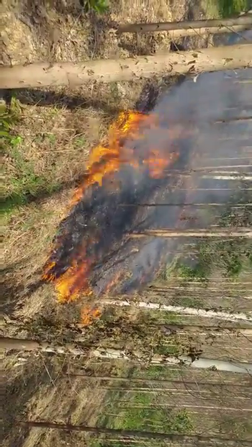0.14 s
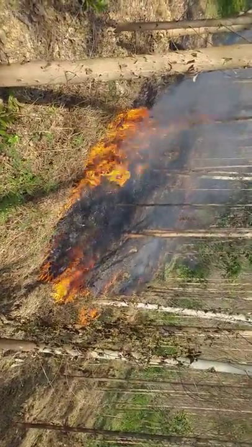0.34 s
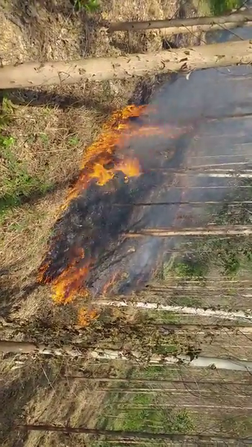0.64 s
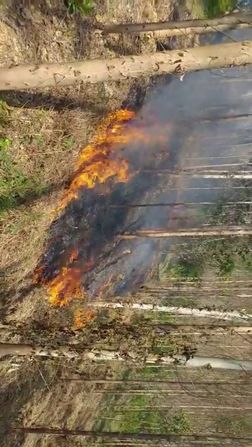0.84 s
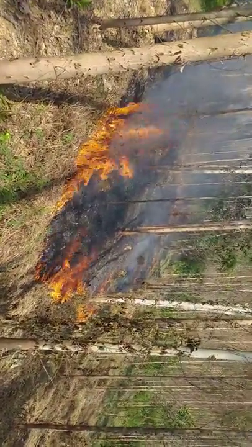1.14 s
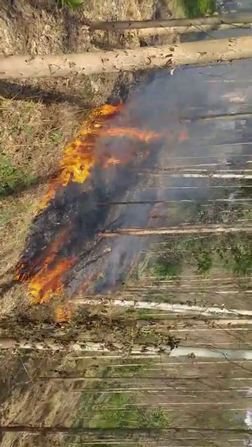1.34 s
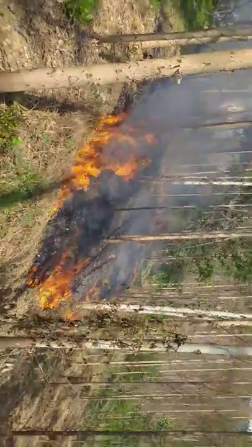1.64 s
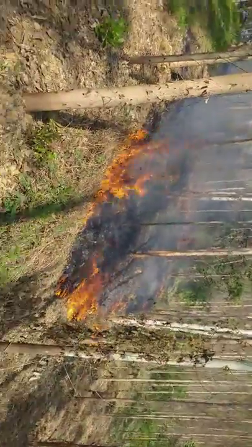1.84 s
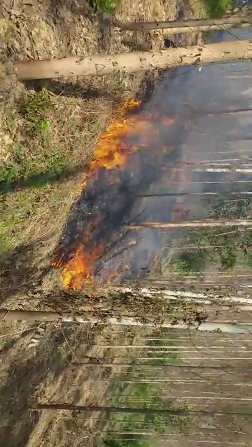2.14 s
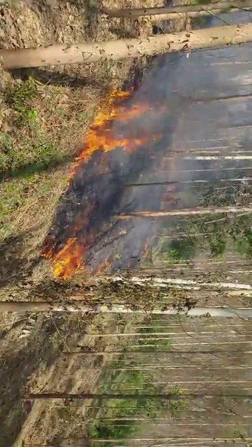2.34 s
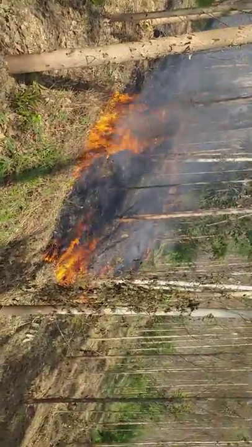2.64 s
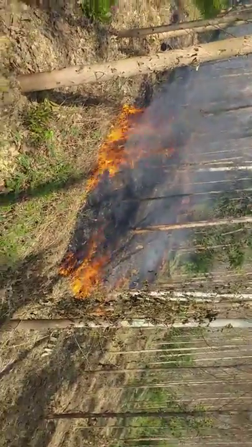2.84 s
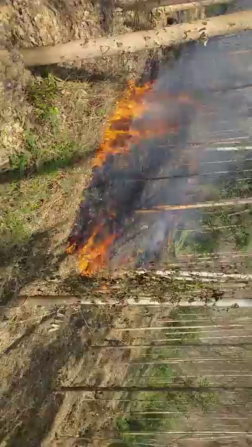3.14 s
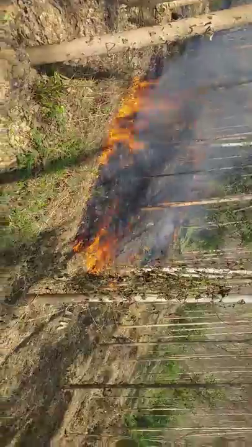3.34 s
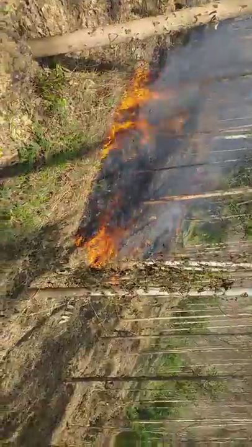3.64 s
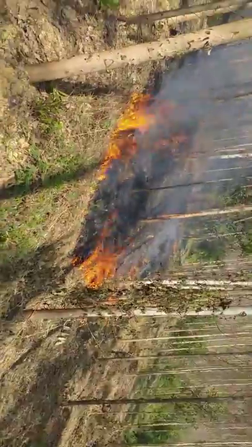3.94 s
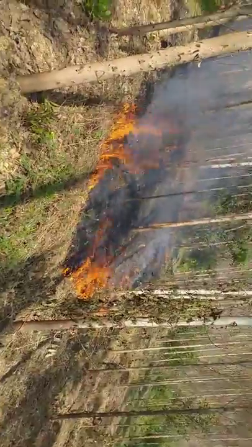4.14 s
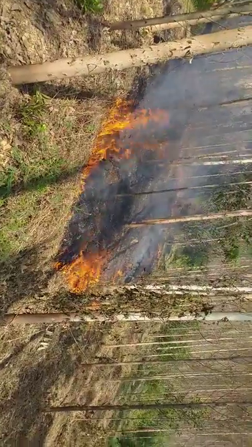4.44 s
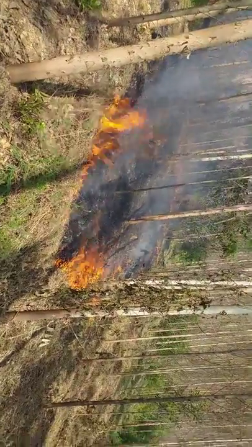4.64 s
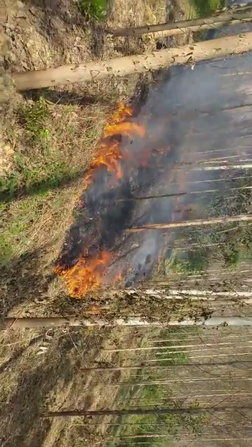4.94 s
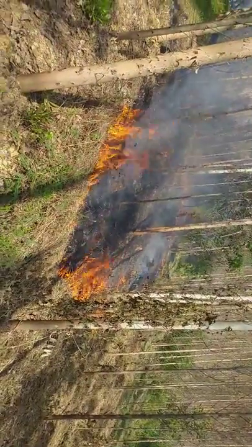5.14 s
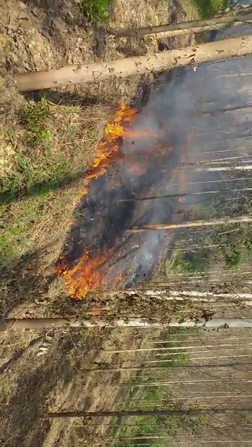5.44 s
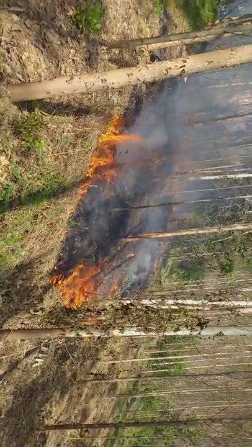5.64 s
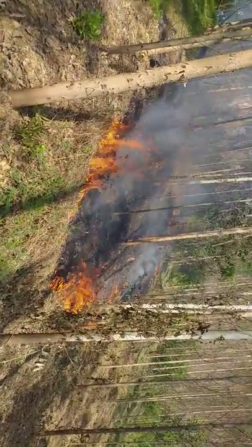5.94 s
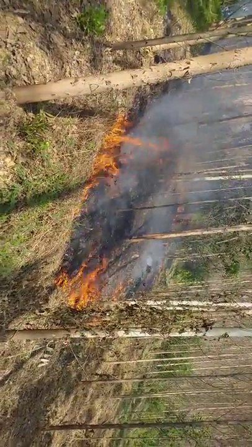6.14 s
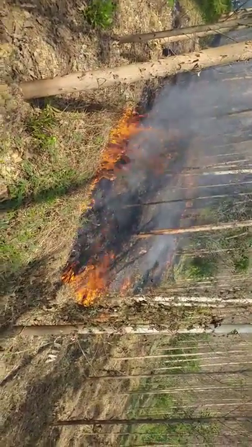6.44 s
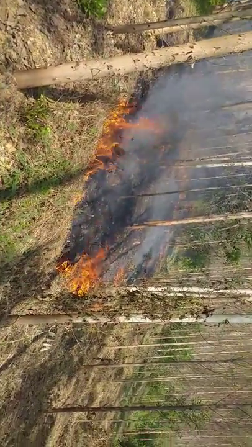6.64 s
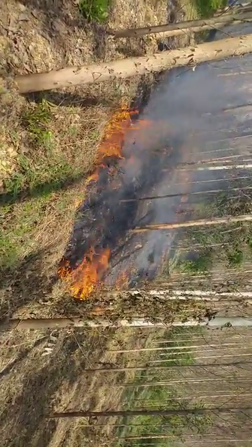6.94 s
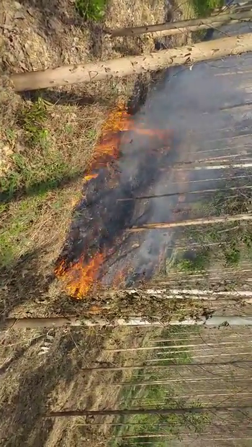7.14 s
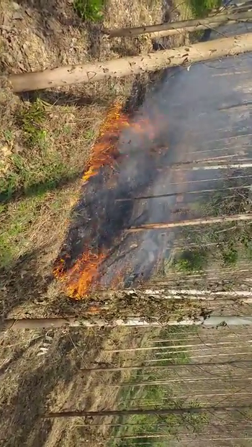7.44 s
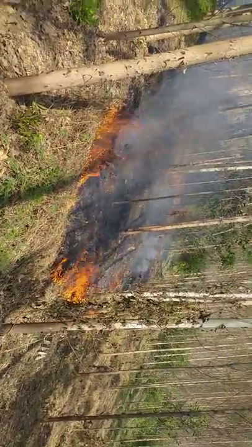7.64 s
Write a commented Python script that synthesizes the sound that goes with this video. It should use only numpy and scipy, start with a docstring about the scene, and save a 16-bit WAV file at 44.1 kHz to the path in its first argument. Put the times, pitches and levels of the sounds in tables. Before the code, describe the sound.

A grass fire crackles close by, bright stalks snapping irregularly over continuous fizzing hiss, with faint low flame rumble and occasional dull pops.

```python
"""Dry grass fire in a wood

A line of dry grass and leaf litter burns some metres from a small microphone.
The far, tiny stalk bursts merge into a grainy hiss of shaped noise and random grains.
Near stalks snap one by one as short filtered noise bursts, a few gas pockets thump as
falling sine swings, and the flames rumble softly below as puffing low noise."""
import sys
import numpy as np
from scipy import signal
from scipy.fft import rfft, irfft
from scipy.io import wavfile
from scipy.ndimage import uniform_filter1d

SR = 44100
rng = np.random.default_rng(int(sys.argv[2]) if len(sys.argv) > 2 else 0)


def dump(signal):
    """Clip the signal to [-1, 1] and save it as 16-bit WAV at the path in sys.argv[1]."""
    limited = np.clip(np.atleast_2d(signal).T, -1, 1)
    pcm = np.round(limited * 32767).astype(np.int16)
    wavfile.write(sys.argv[1], SR, pcm)


N = 343098

# How hard the fire burns. Each row: time in seconds, level of the hiss body (below about 6 kHz) in dB,
# level of its top edge (about 6 to 9 kHz) in dB; both are trimmed in the hiss.
BLAZE = [(0.0, -35, -35), (1.0, -37, -36), (1.21, -39, -38.5), (1.62, -34.5, -46.5), (1.93, -39.5, -40),
         (2.3, -35, -37), (2.69, -36, -39.5), (3.03, -33, -32.5), (3.36, -33.5, -37), (3.64, -31.5, -33.5),
         (5.29, -35, -35), (5.72, -35.5, -35), (5.89, -32, -32), (6.63, -31.5, -43.5), (6.87, -32.5, -59),
         (7.78, -38, -56)]
# The loudest near stalks bursting. Each row: time in seconds, crack peak in dB, knock peak in dB,
# knock pitch in Hz, peak of the high spit on top in dB.
NEAR_SNAPS = [(0.0282, -5, -7.5, 2320.0, -11.5), (0.0415, -25, -33, 2320.0, -20.5),
              (0.0507, -4.5, -9.5, 2540, -14), (0.0594, -17.5, -25, 2360.0, -19),
              (0.0644, -13, -24.5, 1200.0, -21), (0.2313, -11.5, -20, 1850, -27),
              (0.3084, -16.5, -23.5, 2250.0, -25), (0.3272, -11.5, -13, 2500, -15.5),
              (0.3481, -10, -13, 2560.0, -25), (0.3959, -6.5, -13.5, 2140, -10.5),
              (0.4748, -18.5, -15.5, 2000, -24.5), (0.5134, -14, -23, 1320.0, -27.0),
              (0.5299, -13.5, -15, 1120, -17), (0.6775, -17, -22.0, 1440.0, -30),
              (0.7283, -11.5, -20.5, 2480.0, -35), (0.792, -14, -17, 2800.0, -24),
              (0.8105, -7, -13, 3000, -11.5), (0.8476, -32, -22.5, 1940.0, -35.0),
              (0.9035, -16.0, -24.5, 2360, -26), (1.0856, -10.5, -5.5, 2420, -7),
              (1.1273, -18, -25, 2640.0, -21), (1.1566, -13, -18, 1750, -25.5),
              (1.1699, -13.5, -22.0, 2710.0, -19.0), (1.2618, -14.5, -16.5, 2500, -19),
              (1.4847, -14, -6, 2600, -22.0), (1.5487, -15.5, -16, 2690.0, -27),
              (1.5936, -11, -22.5, 2260.0, -27.5), (1.6011, -15, -20.5, 2430.0, -20),
              (1.701, -19, -15, 2380.0, -36.5), (1.8503, -10, -9.5, 2320, -18.5),
              (2.1684, -11.5, -21.0, 2280.0, -25.0), (2.337, -8.5, -13.5, 2100, -30),
              (2.4065, -14.5, -28, 1170, -27), (2.5571, -17, -14, 1850, -30.5),
              (2.6602, -12, -20, 2610.0, -25), (2.7599, -18, -17, 2560, -24),
              (2.7842, -14.5, -12.5, 1530, -31), (2.88, -13, -14.5, 1340, -26.0),
              (2.8995, -10.5, -26, 2590.0, -22.0), (2.9029, -16, -22.5, 1700.0, -19.5),
              (2.9071, -16, -34, 2240.0, -28.0), (3.0474, -10.5, -14, 1840.0, -21.0),
              (3.0554, -18, -13.5, 1760, -24.5), (3.1759, -10.5, -18, 2200.0, -23),
              (3.2411, -22, -18, 2410, -23), (3.2499, -15, -19.5, 1070, -28.5),
              (3.3312, -26, -10, 2350, -27.0), (3.3764, -17, -14.0, 1650, -23),
              (3.5905, -9.5, -13, 2130.0, -17), (3.6105, -9, -28, 2160.0, -9),
              (3.6907, -7.5, -20, 2100.0, -21), (3.7291, -7, -17, 2150.0, -21),
              (3.7751, -28, -19, 1650.0, -21), (3.8007, -25, -15.5, 2650, -26),
              (3.886, -8.5, -14, 2280.0, -32), (4.0305, -15, -15.5, 1810.0, -28),
              (4.2123, -26, -13.5, 2030, -36), (4.2881, -20, -21.0, 2640.0, -24.0),
              (4.3057, -8.5, -18, 2030, -28.5), (4.3517, -11.5, -15, 2160.0, -32),
              (4.5398, -9.5, -12.5, 1080.0, -19), (4.5638, -11, -20, 2510.0, -34),
              (4.6034, -16, -16, 1380, -26.5), (4.655, -10, -20, 1450.0, -23.5),
              (4.6779, -9.5, -22.0, 1520.0, -21), (4.7027, -10, -14, 2340.0, -24.0),
              (4.7081, -25, -14, 2530.0, -22.0), (4.7123, -6.5, -18, 1980.0, -13.5),
              (4.733, -4, -12, 1630.0, -18), (4.7598, -17.5, -14.5, 2100.0, -25.0),
              (4.8361, -33, -11, 2400, -10.5), (4.8401, -7, -9.5, 2140, -25),
              (5.0742, -22, -18.5, 1770, -22), (5.2736, -15.5, -20.5, 2500, -23.0),
              (5.3791, -7.5, -20, 2480, -23), (5.6197, -12, -18.5, 1270, -25),
              (5.7375, -5.5, -16.5, 1800, -16.0), (5.7712, -9.5, -15.5, 1900, -18),
              (5.9127, -16, -17, 2270.0, -11.5), (6.0918, -15, -21, 2250.0, -18.5),
              (6.1512, -15, -27, 2440.0, -23.0), (6.19, -10, -14, 2290.0, -27.5),
              (6.2868, -7, -5.5, 2600, -23.5), (6.3591, -6.5, -17, 1500, -14),
              (6.4581, -9.5, -9, 2350, -16), (6.4622, -22, -18, 1890.0, -26),
              (6.5525, -10, -11, 2370.0, -15), (6.567, -18.5, -13.5, 1430, -24),
              (6.6724, -13, -8.0, 2090.0, -28.5), (6.6763, -17, -24, 2050.0, -24),
              (6.7006, -9, -11.5, 2490, -24), (6.7725, -14, -21, 2520.0, -42), (6.8707, -34, -9, 2300, -41),
              (6.9647, -32, -27, 2160.0, -35.5), (6.9761, -8.5, -2.5, 2300, -31),
              (7.128, -17.5, -13.0, 2380.0, -29), (7.1715, -5.5, -17.5, 2320.0, -27),
              (7.21, -15, -29, 2140.0, -40), (7.5123, -13, -20, 860, -18.5),
              (7.5217, -6.5, -17, 1870.0, -41), (7.5651, -32, -20.5, 2130.0, -41.5),
              (7.5992, -10, -2.5, 2190.0, -19), (7.6087, -8, -12.5, 2330.0, -17)]
# Gas pockets bursting. Each row: time in seconds, peak of the swing in dB, pitch it falls to in Hz,
# peak of the first push in dB.
GAS_POCKETS = [(0.954, -30, 286, -97), (1.823, -30.5, 144, -49), (2.944, -32.5, 140, -60),
               (3.147, -30, 110, -39), (5.0062, -18.5, 136, -12), (5.087, -30.5, 130, -60),
               (5.2166, -21.5, 179, -22), (5.740, -24, 184, -29), (6.568, -22.5, 92, -25),
               (7.5124, -17.5, 136, -11.5), (7.6, -13, 185, -48), (7.616, -27.5, 200, -60)]
# A short rough murmur of the flames. Each row: time in seconds, level in dB.
FLUTTER_LEVEL = [(2.02, -69), (2.04, -50), (2.126, -45.5), (2.186, -49), (2.2, -73), (2.222, -45),
                 (2.25, -67)]
# Colour filter of the hiss. Each row: frequency in Hz, gain in dB.
HISS_COLOUR = [(290, -54), (500, -28), (648, -12.5), (929, -6.5), (1290, -12), (1800, -10.5), (2370, -3),
               (3250, -2.5), (5220, -1.5), (6300, -3), (8650, -27.5), (12600, -5.5), (13900, -5.5),
               (15600, -5.5)]
# Colour filter of the flame rumble. Each row: frequency in Hz, gain in dB.
RUMBLE_COLOUR = [(18, -11), (35, -19), (60, -2), (86, -0.5), (160, 0), (339, -4), (606, -15), (700, -52),
                 (910, -38), (1540, -120)]

CRACK_HZ, CRACK_HZ_PER_DB = 5000, 44.5         # a crack is lower when the hiss is duller
CRACK_SPAN = np.array([0.73, 1.278])           # band edges as shares of the crack's pitch
SPIT_BAND_HZ = [10940, 15330]
BODY_TOP_HZ, EDGE_TOP_HZ = 6270, 9300          # where the hiss is split into body, edge and treble
TREBLE_DB, TREBLE_FOLLOWS = -3.5, 0.18         # relative to the blaze body; share of the edge's swing
AIR_HZ, AIR_LOSS_PER_DB = 14100, 0.38          # the very top thins as the edge sinks
RUMBLE_DB, RUMBLE_FOLLOWS = -49, 0.65          # at the mean level of the blaze; share of its swing
FLUTTER_HZ, FLUTTER_WIDTH_HZ = 520, 150
MIC_BASS_HZ, MIC_TOP_HZ, MIC_LIMIT = 57, 15700, 0.92


def from_db(db):
    """Turns dB into gain."""
    return 10 ** (np.asarray(db) / 20)


def rms_one(x):
    """Scales a sound to rms 1."""
    return x / np.sqrt(np.mean(x ** 2) + 1e-20)


def peak_one(x):
    """Scales each row to peak 1."""
    return x / np.max(np.abs(x), axis=-1, keepdims=True)


def in_time(rows, **ends):
    """Draws each column of a table as a curve, one value per sample."""
    s, *columns = np.transpose(rows)
    return [np.interp(np.arange(N) / SR, s, column, **ends) for column in columns]


def drift(rate_hz):
    """Slow chance: noise through a double one-pole low-pass, spread 1."""
    step = 40   # samples per slow value
    r = np.exp(-2 * np.pi * rate_hz * step / SR)
    noise = rng.standard_normal(N // step + 2002)
    slow = signal.lfilter([1], [1, -2 * r, r * r], noise)[2000:]   # skip the filter's run-in
    return np.interp(np.arange(N) / step, np.arange(len(slow)), rms_one(slow))


def butter(x, hz, kind, order=2):
    """Causal Butterworth filter along the last axis."""
    return signal.sosfilt(signal.butter(order, hz, kind, fs=SR, output="sos"), x)


def butter_in_place(x, hz, kind, order):
    """Butterworth filter run both ways, so nothing shifts in time."""
    return signal.sosfiltfilt(signal.butter(order, hz, kind, fs=SR, output="sos"), x)


def resonance(x, hz, width_hz):
    """Two-pole band-pass with a gain of about 1 at its centre."""
    r = np.exp(-np.pi * width_hz / SR)
    feed = (1 - r * r) / 2 * np.array([1, 0, -1])
    back = [1, -2 * r * np.cos(2 * np.pi * hz / SR), r * r]
    return signal.lfilter(feed, back, x + 1e-18)


def coloured(x, colour):
    """Causal filter with the given colour (minimum phase from the folded cepstrum)."""
    colour_hz, colour_db = np.transpose(colour)
    hz = np.maximum(np.arange(2049) * SR / 4096, 10)
    gain = from_db(np.interp(np.log(hz), np.log(colour_hz), colour_db))
    cepstrum = irfft(np.log(gain))
    cepstrum[1:2048] *= 2
    cepstrum[2049:] = 0
    impulse = irfft(np.exp(rfft(cepstrum)))
    return signal.oaconvolve(x, impulse)[:N]


def add(out, s, sound):
    """Mixes a short sound in at a time in seconds."""
    at = max(round(s * SR), 0)
    out[at:at + len(sound)] += sound[:N - at]


def snaps(brightness_db):
    """Each stalk tears within a millisecond, is mirrored by the ground and splutters on for a moment."""
    count, length = len(NEAR_SNAPS), 900
    out, t = np.zeros(N), np.arange(length) / SR
    noise = rng.standard_normal((3, count, length))   # one layer each for crack, knock and spit
    chance = rng.random((count, 2))
    echo_s, echo_share = 0.00033 + 0.0008 * chance[:, :1], 0.33 + 0.47 * chance[:, 1:]
    direct = np.exp(-t / 0.0005) * (1 - np.exp(-t / 0.00012))
    mirrored = echo_share * (t > echo_s) * np.exp(-np.abs(t - echo_s) / 0.00044)
    # the high power leaves only a few strong splinters
    splinters = uniform_filter1d(rng.random((count, length)) ** 40, size=12) * 12
    splutter = (0.053 + 0.15 * splinters) * np.exp(-t / 0.014) * (1 - t / t[-1])
    bursts = noise * (direct + mirrored + splutter)
    spits = peak_one(butter(bursts[2], SPIT_BAND_HZ, "band", order=3))
    for k, (s, crack_db, knock_db, knock_hz, spit_db) in enumerate(NEAR_SNAPS):
        crack_hz = CRACK_HZ + CRACK_HZ_PER_DB * brightness_db[round(s * SR)]
        crack = butter(bursts[0, k], crack_hz * CRACK_SPAN, "band", order=3)
        knock = resonance(bursts[1, k], knock_hz, 0.75 * knock_hz)
        knock = butter(knock, [0.34 * knock_hz, 2.37 * knock_hz], "band")
        snap = from_db(crack_db) * peak_one(crack) + from_db(knock_db) * peak_one(knock)
        add(out, s - 0.0003, snap + from_db(spit_db) * spits[k])
    return out


def thumps():
    """A sudden push of gas, then a swing or two of the air, falling to the pocket's pitch."""
    out, t = np.zeros(N), np.arange(2600) / SR
    for s, swing_db, hz, push_db in GAS_POCKETS:
        push = -np.exp(-((t - 0.0004) / 0.00022) ** 2)
        phase = 2 * np.pi * hz * t * (1 + 0.89 * np.exp(-t / 0.0033))
        swing = np.sin(phase) * np.exp(-t * hz / 0.6)
        add(out, s, from_db(push_db) * push)
        add(out, s + 0.00058, from_db(swing_db) * peak_one(swing))
    return out


def grains(per_s, spread_db, most_db, burst_s, top_hz, sharpness, clumps_db):
    """Random bursts of very uneven size, each a short splutter at one of ten pitches; rms 1."""
    sizes = from_db(np.minimum(spread_db * rng.exponential(1, N), most_db))
    born = rng.random(N) < per_s * from_db(clumps_db * drift(8)) / SR   # bursts come in clumps
    pitches, dealt = np.geomspace(850, top_hz, 10), rng.integers(0, 10, N)
    r = np.exp(-1 / (burst_s * SR))
    out = np.zeros(N)
    for k, hz in enumerate(pitches):
        decay = signal.lfilter([1], [1, -r], sizes * born * (dealt == k) + 1e-18)
        splutter = decay * rng.standard_normal(N)
        # thicker stalks are lower and louder
        out += resonance(splutter, hz, hz / sharpness) / hz ** 0.51
    return rms_one(out)


def hiss(body_db, edge_db, treble_db):
    """Far crackle merged to noise, fine fizz, small separate crackles and thin high ticks, in one colour."""
    far = from_db(1.5 + 1.44 * drift(25)) * rng.standard_normal(N)
    fizz = grains(2500, spread_db=1, most_db=35, burst_s=0.0026,
                  top_hz=14200, sharpness=0.31, clumps_db=2.5)
    crackle = grains(300, spread_db=8.5, most_db=19, burst_s=0.00096,
                     top_hz=5460, sharpness=0.88, clumps_db=3.5)
    ticks = grains(200, spread_db=5, most_db=13, burst_s=0.0007,
                   top_hz=15000, sharpness=1.2, clumps_db=4)
    ticks = rms_one(butter(ticks, 9000, "high"))
    whole = coloured(far + fizz + from_db(-0.5) * crackle + from_db(-13) * ticks, HISS_COLOUR)
    # three bands that add up to the whole, so their levels can move apart without a hole between them
    body = butter_in_place(whole, BODY_TOP_HZ, "low", order=3)
    below_treble = butter_in_place(whole, EDGE_TOP_HZ, "low", order=3)
    edge, treble = below_treble - body, whole - below_treble
    dullness_db = body_db - edge_db
    air = butter_in_place(treble, AIR_HZ, "high", order=2)
    treble = treble - np.clip(AIR_LOSS_PER_DB * dullness_db, 0, 0.9) * air
    # as the top edge sinks, the hiss gathers in a narrower band
    gathered = np.clip((dullness_db + 4.5) / 11.7, 0, 2) * resonance(body, 4730, 670)
    return (from_db(body_db - 3) * rms_one(body + gathered)
            + from_db(edge_db - 2.22) * rms_one(edge)
            + from_db(treble_db) * rms_one(treble))


def flames(rumble_db):
    """Turbulent low noise that comes in puffs, with a short rough murmur around one pitch."""
    puffs = from_db(3.3 * drift(12.3)) * rng.standard_normal(N)
    rumble = rms_one(coloured(puffs, RUMBLE_COLOUR))
    flutter_db, = in_time(FLUTTER_LEVEL, left=-120, right=-120)
    rough = from_db(2 * drift(35)) * rng.standard_normal(N)
    flutter = resonance(rough, FLUTTER_HZ, FLUTTER_WIDTH_HZ)
    flutter = resonance(flutter, FLUTTER_HZ, 2 * FLUTTER_WIDTH_HZ)
    return from_db(rumble_db) * rumble + from_db(flutter_db) * rms_one(flutter)


def scene():
    """All the fire's sounds at one microphone; the treble and the rumble follow the blaze."""
    body_db, edge_db = in_time(BLAZE)
    brightness_db = edge_db - body_db
    treble_db = body_db + TREBLE_DB + TREBLE_FOLLOWS * brightness_db
    rumble_db = RUMBLE_DB + RUMBLE_FOLLOWS * (body_db - body_db.mean())
    fire = snaps(brightness_db) + thumps() + hiss(body_db, edge_db, treble_db) + flames(rumble_db)
    return fire[None]   # one channel


def record(dry):
    """The small microphone loses the deep bass, limits hard just under full scale and cuts the top."""
    heard = np.clip(butter(dry, MIC_BASS_HZ, "high", order=3), -MIC_LIMIT, MIC_LIMIT)
    top_cut = signal.ellip(12, 0.5, 85, MIC_TOP_HZ, fs=SR, output="sos")   # ripple and stop-band in dB
    return signal.sosfilt(top_cut, heard)


dry = scene()
out = record(dry)
dump(out)
```